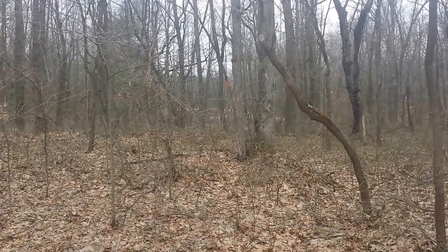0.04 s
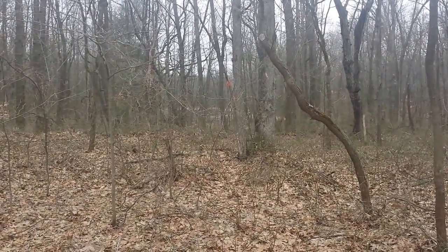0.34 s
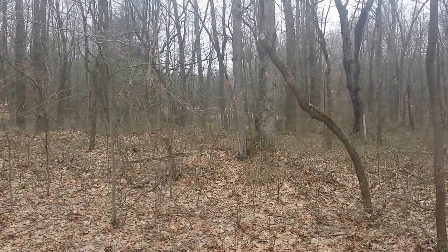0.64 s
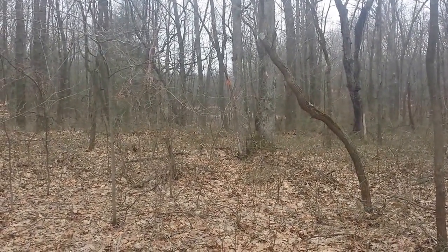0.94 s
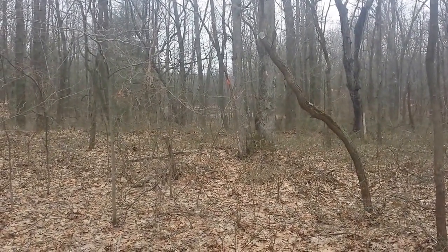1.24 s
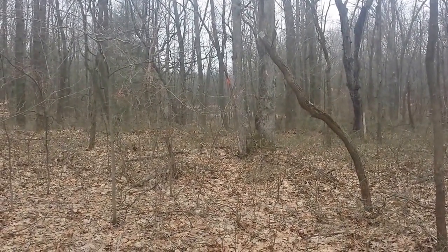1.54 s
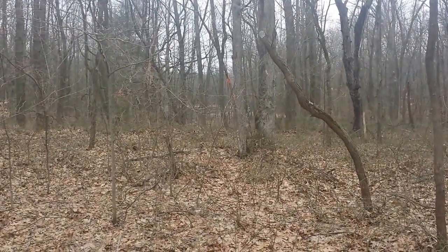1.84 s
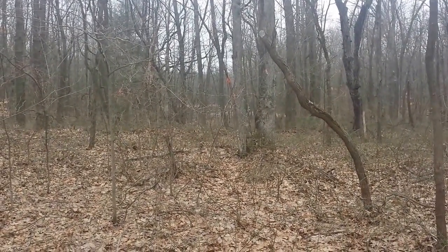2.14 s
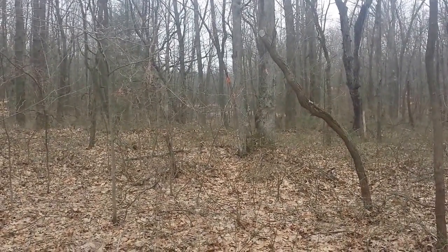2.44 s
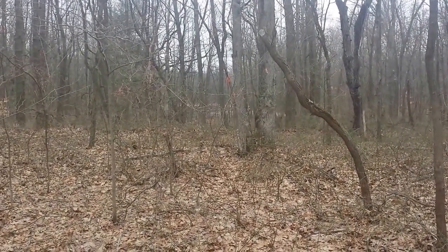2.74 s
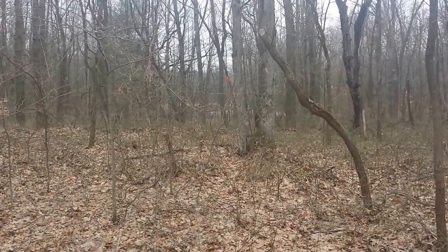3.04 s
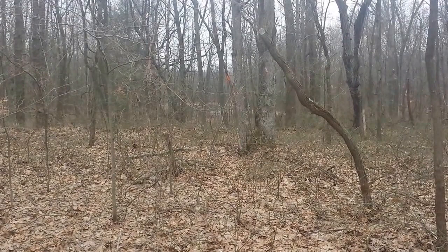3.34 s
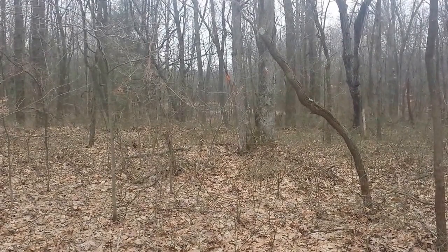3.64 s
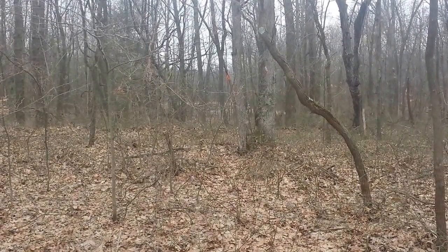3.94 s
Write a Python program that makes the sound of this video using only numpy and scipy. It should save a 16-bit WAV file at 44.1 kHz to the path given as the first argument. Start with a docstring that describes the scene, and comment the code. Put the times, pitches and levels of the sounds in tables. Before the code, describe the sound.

Hundreds of small frogs peep steadily in a leafless woodland, their rising whistles merging into a shrill shimmer, louder on the left. A soft knock, a thin bird chip and a sharp microphone tick come in turn.

```python
"""Bare woodland: a dense chorus of spring peepers, the larger crowd to the left.
Each frog repeats a short rising whistle; hundreds scatter off the trunks and merge into a shrill shimmer.
Behind them: faint low rumble, air hiss, a wash of far callers, a murmur, low distant blips.
A soft knock, one thin bird chip and a sharp tick on the right microphone stand out."""
import sys
import numpy as np
from scipy import signal
from scipy.fft import rfft, irfft
from scipy.io import wavfile

SR = 44100
rng = np.random.default_rng(int(sys.argv[2]) if len(sys.argv) > 2 else 0)


def wrap_up_sound(samples):
    """Save the sound to the file named by the first command line argument, as 16-bit audio."""
    columns = np.atleast_2d(samples).T
    # keep every value between -1 and 1, then stretch to whole-number steps
    tamed = np.clip(columns, -1, 1)
    steps = np.round(tamed * 32767).astype(np.int16)
    wavfile.write(sys.argv[1], SR, steps)


N = 176400
TIME_S = np.arange(N) / SR

# rumble spectrum: f/Hz, density/(dB per Hz)
RUMBLE_SPECTRUM = [(20, -97), (35, -87.5), (60, -79), (100, -80), (160, -86.5), (270, -89.5), (520, -99),
                   (1300, -115), (4000, -140)]
# rumble drift: t/s, gain/dB
RUMBLE_DRIFT = [(0, 0.5), (1, -1), (1.8, 1), (2.2, 1.5), (2.8, 1), (3.1, -0.5), (4, 0.5)]
# air hiss: f/Hz, density/(dB per Hz)
AIR_SPECTRUM = [(100, -100), (350, -91), (550, -93), (900, -87.5), (1300, -90), (4000, -103), (7500, -99.5),
                (9500, -102), (11000, -100.5), (12500, -104), (15500, -104.5)]
# farthest callers: f/Hz, left density/(dB per Hz), right density/(dB per Hz)
FAR_CHORUS_SPECTRUM = [(1200, -105, -102), (1525, -88.5, -84.5), (1925, -84.5, -80.5), (2292, -81.5, -67.5),
                       (2540, -67, -68), (3020, -62, -65.5), (3656, -75, -82), (3836, -98.5, -99),
                       (4090, -101, -106), (4275, -86, -96), (4690, -80.5, -90), (5110, -83.5, -94),
                       (5520, -96.5, -102), (6060, -84.5, -96), (6570, -91.5, -101), (6930, -95, -108),
                       (8600, -106, -118)]
# murmur swells: peak t/s, length/s, level/dB
MURMUR_SWELLS = [(1.88, .55, -61.5), (2.58, .3, -67.5), (3.615, 0.36, -57)]
# distant blips: t/s, f/Hz, level/dB
BLIP_NOTES = [(.305, 427, -58.5), (.595, 463, -61), (1.45, 437, -60.5)]
# knock modes: f/Hz, relative level/dB, T60/s
KNOCK_RESONANCES = [(207, -1.5, 0.11), (352, 4, 0.023), (520, -2, 0.022), (750, -7, 0.018)]
# calls pitched outside the crowds: t/s, start f/Hz, level/dB, left minus right/dB
LONE_CALLS = [(.42, 3520, -45, 8), (1.12, 3490, -43, 5), (1.92, 3500, -43, 5), (2.35, 2070, -43, -17),
              (2.9, 3510, -42.5, 8), (3.45, 2330, -42, -10), (3.67, 3480, -44, 10)]
# frog crowds: level/dB, mean f/Hz, f spread/Hz, left minus right/dB, second harmonic/dB
FROG_CROWDS = [(-24, 3108, 124, 24, -33), (-30.5, 3065, 145, -10, -33.5)]


def from_db(db):
    """Decibels to gain."""
    return 10 ** (np.asarray(db) / 20)


def unit_rms(x):
    """Scale to rms 1."""
    return x / np.sqrt(np.mean(x ** 2) + 1e-20)


def pan(lean_db):
    """Constant-power gains; positive leans left."""
    gains = from_db([[lean_db / 2], [-lean_db / 2]])
    return gains / np.linalg.norm(gains)


def add(track, at_s, sound):
    """Mix a sound in at at_s; drop any overhang."""
    start = int(at_s * SR)
    low, high = max(start, 0), min(start + len(sound), len(track))
    if high > low:
        track[low:high] += sound[low - start:high - start]


def noise(points_hz, density_db):
    """Steady noise of given spectral density."""
    hz = np.maximum(np.arange(N // 2 + 1) * SR / N, 1)
    gain = from_db(np.interp(np.log(hz), np.log(points_hz), density_db))
    return irfft(rfft(rng.standard_normal(N)) * gain * np.sqrt(SR / 2), N)


def whistle(length_s, start_hz, glide_hz=0, octave_gain=0):
    """Gliding sine with optional octave; swells and fades."""
    progress = np.linspace(0, 1, int(length_s * SR))
    phase = 2 * np.pi * np.cumsum(start_hz + glide_hz * progress) / SR
    envelope = np.sqrt(np.abs(np.sin(np.pi * progress)))
    return envelope * (np.sin(phase) + octave_gain * np.sin(2 * phase))


def woodland(x, direct_db, t60_s=0.98, build_s=0.012):
    """Direct sound plus decaying scatter off the trunks, independent per side."""
    t = TIME_S[:SR]
    envelope = from_db(-60 * t / t60_s) * (1 - np.exp(-t / build_s))
    response = rng.standard_normal((2, SR)) * envelope
    response /= np.linalg.norm(response, axis=1, keepdims=True)
    direct = from_db(direct_db)
    response[:, 0] = direct
    return signal.fftconvolve(x[None], response, axes=1)[:, :len(x)] / np.hypot(1, direct)


def rumble(shared_power=0.47):
    """Far low rumble, partly common to both sides; level drifts slightly."""
    left, right, common = (noise(*np.transpose(RUMBLE_SPECTRUM)) for _ in range(3))
    drift = from_db(np.interp(TIME_S, *np.transpose(RUMBLE_DRIFT)))
    return drift * (np.sqrt(1 - shared_power) * np.array([left, right]) + np.sqrt(shared_power) * common)


def air():
    """Even hiss, independent per side."""
    return np.array([noise(*np.transpose(AIR_SPECTRUM)) for _ in range(2)])


def far_chorus():
    """Farthest callers, blurred to steady noise."""
    hz, left_db, right_db = np.transpose(FAR_CHORUS_SPECTRUM)
    return np.array([noise(hz, left_db), noise(hz, right_db)])


def murmur(centre_hz=270, width_hz=90):
    """Faint low noise band in Gaussian swells."""
    swells = sum(from_db(db) * np.exp(-(2 * (TIME_S - peak_s) / length_s) ** 2)
                 for peak_s, length_s, db in MURMUR_SWELLS)
    b, a = signal.iirpeak(centre_hz, centre_hz / width_hz, fs=SR)
    band = signal.lfilter(b, a, signal.lfilter(b, a, rng.standard_normal((2, N))))
    return swells * unit_rms(band)


def blips(length_s=0.056):
    """Short low notes, far off."""
    notes = np.zeros(N)
    for at_s, hz, db in BLIP_NOTES:
        add(notes, at_s, from_db(db) * whistle(length_s, hz))
    return woodland(notes, direct_db=4)


def knock(at_s=0.874, level_db=-46):
    """Soft, dull knock nearby: damped modes."""
    t = np.maximum(TIME_S - at_s, 0)
    return sum(from_db(level_db + db - 60 * np.minimum(t / t60_s, 2)) * np.sin(2 * np.pi * hz * t)
               for hz, db, t60_s in KNOCK_RESONANCES)


def bird(at_s=2.839, level_db=-39):
    """One thin falling chip, echoing in the trees."""
    chip = np.zeros(N)
    add(chip, at_s, whistle(length_s=0.0238, start_hz=6780, glide_hz=-420))
    return from_db(level_db) * pan(lean_db=16) * woodland(chip, direct_db=1)


def tick(at_s=3.63865, step_db=-7, leak_hz=93, leak_q=0.7, top_hz=9600):
    """Pressure step on the right microphone; leaks away with one undershoot."""
    step = (TIME_S >= at_s) * from_db(step_db)
    w = 2 * np.pi * leak_hz
    leaked = signal.lfilter(*signal.bilinear([1, 0, 0], [1, w / leak_q, w * w], SR), step)
    right = signal.lfilter(*signal.butter(2, top_hz, fs=SR), leaked)
    return np.array([np.zeros(N), right])


def lone_frogs(length_s=0.14, rise_hz=268.4):
    """One very high peeper and two low calls, either side of the chorus pitch."""
    calls = np.zeros((2, N))
    for at_s, hz, db, lean_db in LONE_CALLS:
        peep = from_db(db) * whistle(length_s, hz, rise_hz)
        for track, gain in zip(calls, pan(lean_db)):
            add(track, at_s, gain * peep)
    return np.array([woodland(track, direct_db=-1)[side] for side, track in enumerate(calls)])


def frog_spot(pitches_hz, octave_db, peep_s=0.1, rise_hz=268.4, period_s=0.7, spread_db=1.5):
    """Frogs at one spot; each repeats a rising peep at its own level, pace and length."""
    calls = np.zeros(N + SR)  # 1 s lead-in: already calling at t = 0
    for hz in pitches_hz:
        loudness, slowness, length = np.clip(rng.standard_normal(size=3), -2, 2)
        beats = rng.random() + np.arange(-1, 10) + rng.normal(scale=0.06, size=11)
        own_period_s = period_s * np.exp(0.12 * slowness)
        own_peep_s = peep_s * np.exp(0.1496 * length)
        peep = whistle(own_peep_s, hz - rise_hz / 2, rise_hz, from_db(octave_db))
        peep *= from_db(spread_db * loudness)
        for beat in beats:
            add(calls, beat * own_period_s, peep)
    return woodland(calls, direct_db=-6.5)[:, SR:]


def frog_crowd(level_db, mean_hz, spread_hz, lean_db, octave_db, spots=10, per_spot=60):
    """Peepers with normally distributed pitches, dealt over spots with separate echoes."""
    draws = np.sort(rng.standard_normal(spots * per_spot * per_spot))
    pitches_hz = mean_hz + spread_hz * draws[per_spot // 2::per_spot]  # even quantiles
    calls = sum(frog_spot(pitches_hz[k::spots], octave_db) for k in range(spots))
    return from_db(level_db) * pan(lean_db) * unit_rms(calls)


def scene():
    """Chorus, background and small events; stereo."""
    chorus = sum(frog_crowd(*row) for row in FROG_CROWDS) + lone_frogs()
    background = murmur() + far_chorus() + air() + rumble() + blips()
    return chorus + background + knock() + bird() + tick()


def record(dry, cutoff_hz=15500):
    """Steep elliptic low-pass."""
    return signal.sosfilt(signal.ellip(10, 0.1, 80, cutoff_hz, fs=SR, output="sos"), dry)


dry = scene()
out = record(dry)
wrap_up_sound(out)
```